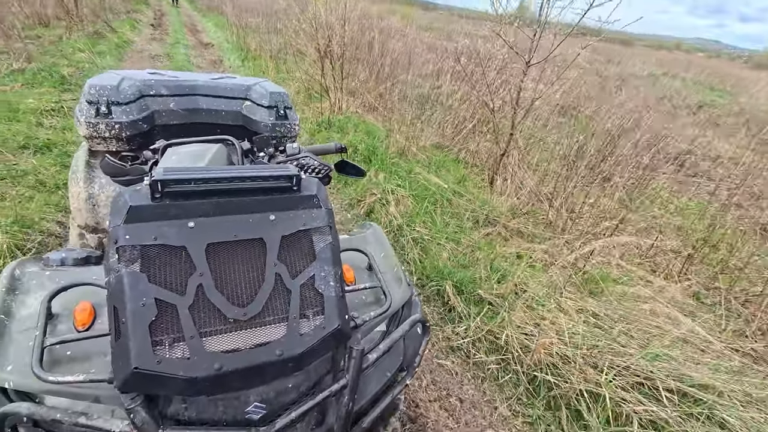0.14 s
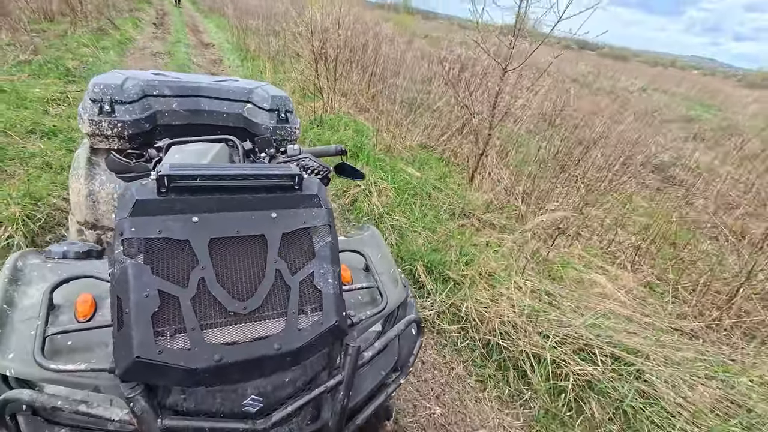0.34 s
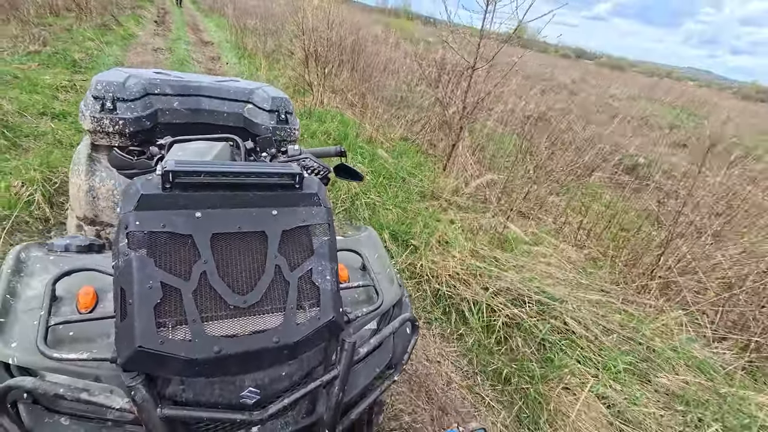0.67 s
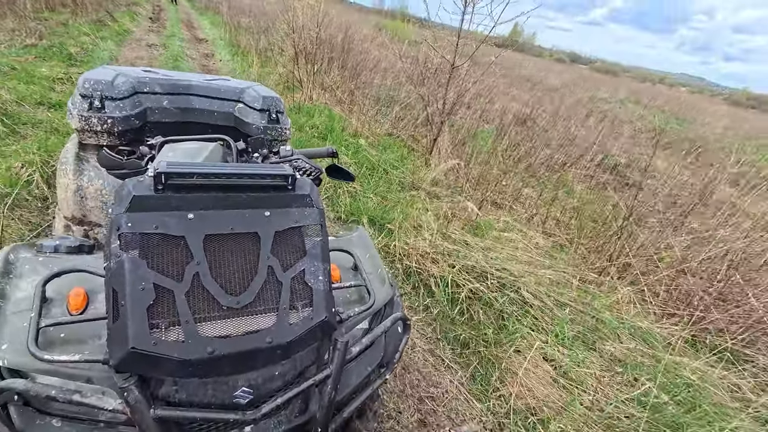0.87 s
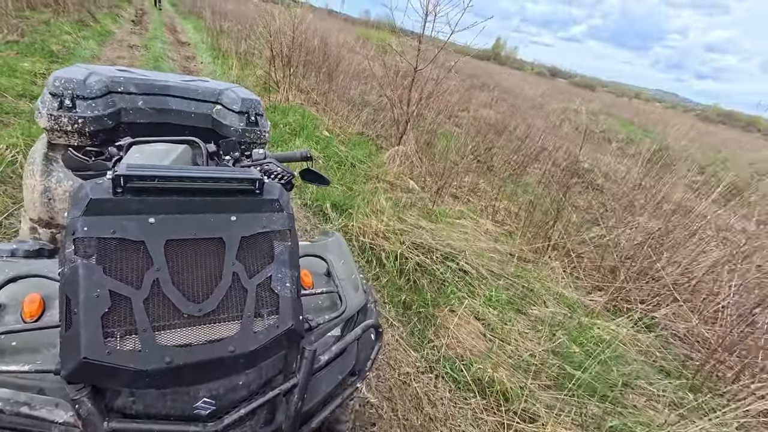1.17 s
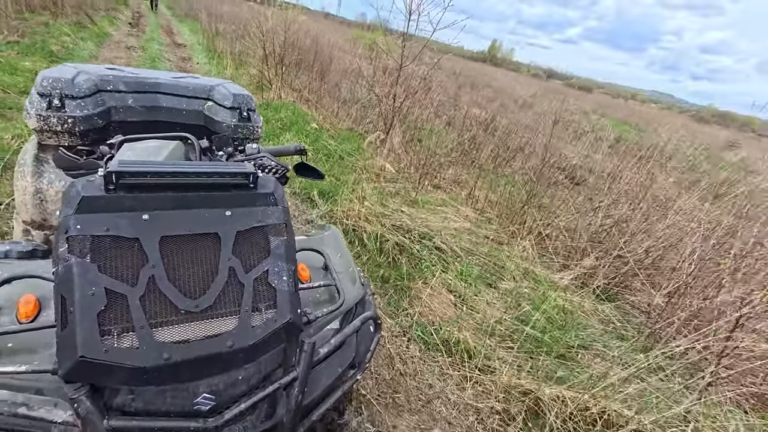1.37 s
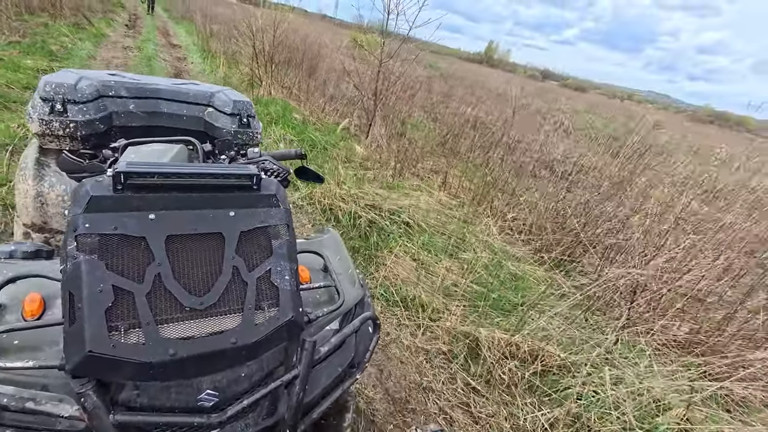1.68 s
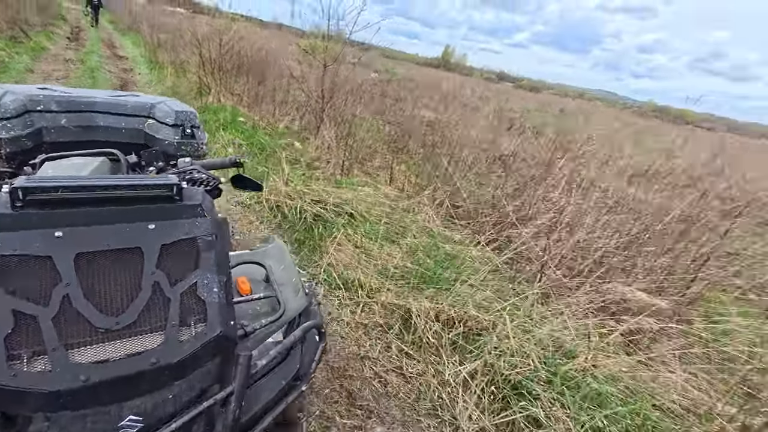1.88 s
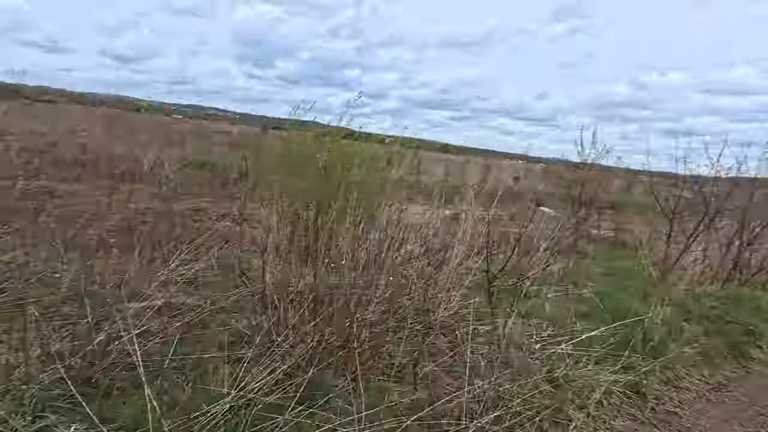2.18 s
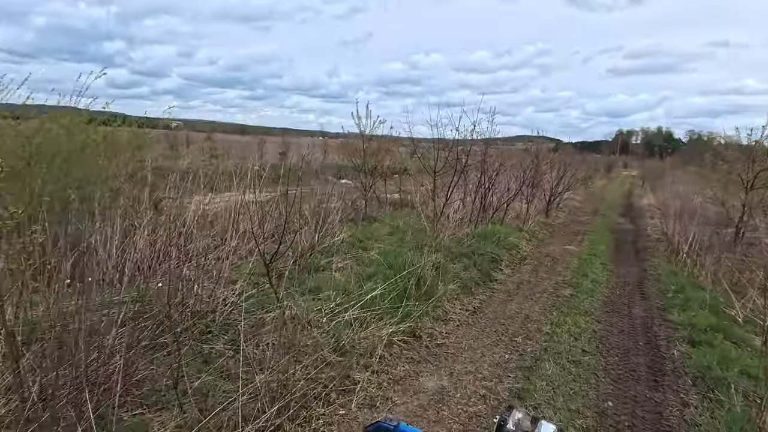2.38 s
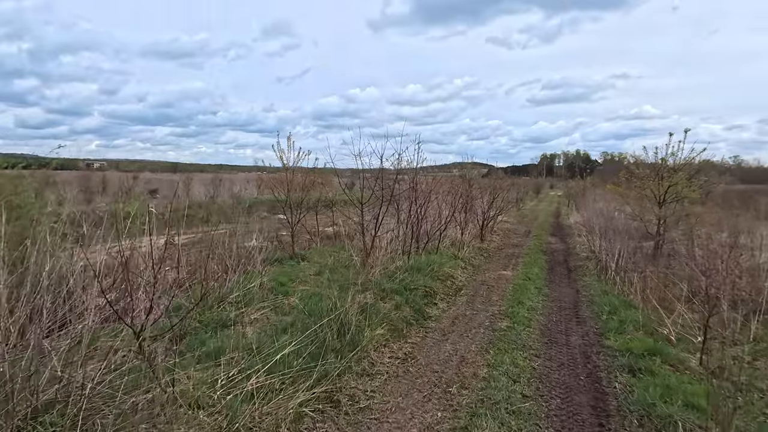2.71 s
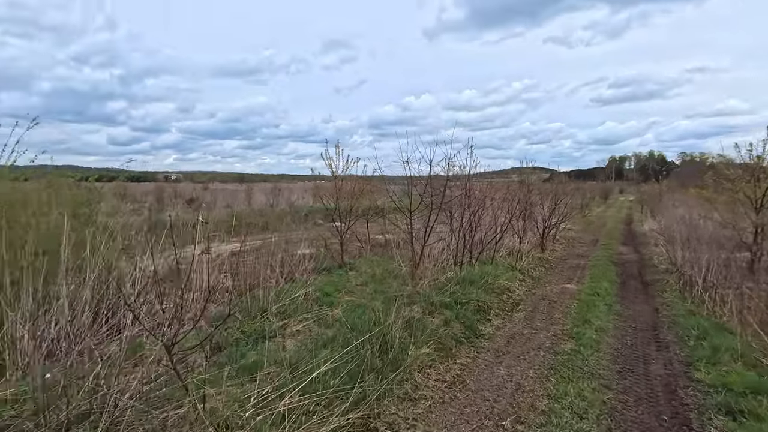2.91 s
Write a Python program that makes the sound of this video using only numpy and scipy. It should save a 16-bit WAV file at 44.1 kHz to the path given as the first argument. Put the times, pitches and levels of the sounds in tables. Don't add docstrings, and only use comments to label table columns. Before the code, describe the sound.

Close outdoor pickup of a quad bike engine: a continuous deep, lumpy boom with rough gas roar, valve ticking and faint loose rattles. Around two seconds in, the revs climb gently and the mechanical tone gets brighter.

```python
import sys
import numpy as np
from scipy import signal
from scipy.fft import rfft, irfft, next_fast_len
from scipy.io import wavfile

SR = 44100
rng = np.random.default_rng(int(sys.argv[2]) if len(sys.argv) > 2 else 0)


def generate_wav(signal):
    frames = np.transpose(np.atleast_2d(signal))
    scaled = np.clip(frames, -1, 1) * 32767
    pcm = np.round(scaled).astype(np.int16)
    wavfile.write(sys.argv[1], SR, pcm)


def amplitude_ratio(level_db):
    exponent = np.asarray(level_db, float) / 20
    return 10 ** exponent


N = 134505

FIRE_AT, FIRE_GAP, VALVE_GAP = 0.52, 0.61, 0.375
LEAD = (0.04, -0.07)


def rms_one(x):
    return x / np.sqrt(np.mean(x ** 2) + 1e-20)


def in_time(rows):
    s, *columns = np.transpose(rows)
    return [np.interp(np.arange(N) / SR, s, column) for column in columns]


def drift(rate_hz):
    r = np.exp(-80 * np.pi * rate_hz / SR)
    noise = rng.standard_normal(N // 40 + 2002)
    slow = signal.lfilter([1], [1, -2 * r, r * r], noise)[2000:]
    return np.interp(np.arange(N) / 40, np.arange(len(slow)), rms_one(slow))


def ring(clicks, hz, t60):
    r = amplitude_ratio(-60 / (t60 * SR))
    w = 2 * np.pi * hz / SR
    return signal.lfilter([0, np.sin(w)], [1, -2 * r * np.cos(w), r * r], clicks + 1e-18)


def coloured(x, spectrum, peaks=()):
    size = next_fast_len(N + 4096)
    hz = np.arange(size // 2 + 1) * SR / size + 1
    points = np.array(spectrum)
    db = np.interp(np.log(hz), np.log(points[:, 0]), points[:, 1], left=-120, right=-120)
    for top_hz, width, top_db in peaks:
        db = db + top_db / (1 + (2 * (hz - top_hz) / width) ** 2)
    return rms_one(irfft(rfft(x, size) * amplitude_ratio(db), size)[:N])


def cycles():
    # (time [s], speed [cycles/s])
    speed = [(0.0, 23.505), (0.22, 22.978), (0.44, 22.774), (0.65, 22.511), (0.87, 22.315), (1.09, 22.511),
             (1.31, 22.07), (1.52, 22.245), (1.74, 22.16), (1.96, 22.395), (2.18, 23.093), (2.4, 23.682),
             (2.61, 23.849), (2.83, 24.056), (3.05, 24.48)]
    return np.cumsum(in_time(speed)[0]) / SR


def firings(spread_db, second_db, lead, gap):
    clicks = np.zeros(N)
    for at, db in ((FIRE_AT + lead, 0), (FIRE_AT + lead + gap, second_db)):
        where = np.flatnonzero(np.diff(np.floor(cycles() - at)))
        strength_db = db + spread_db * rng.standard_normal(100)[:len(where)]
        clicks[where] = amplitude_ratio(strength_db)
    return clicks


def puffs(depth, width_s, spread_db, second_db, lead, gap=VALVE_GAP):
    bump = np.exp(-0.5 * (np.arange(-1000, 1001) / SR / width_s) ** 2)
    clicks = firings(spread_db, second_db, lead + 0.07, gap)
    gate = signal.fftconvolve(clicks, bump, "same")
    return rng.standard_normal(N) * (1 + depth * gate)


def both_sides(turn, make, levels_db):
    facing = amplitude_ratio(levels_db[0]) * make(0)
    turned = amplitude_ratio(levels_db[1]) * make(1)
    return np.sqrt(1 - turn) * facing + np.sqrt(turn) * turned


def boom(turn):
    # (multiple of the cycle rate, level [dB])
    facing = [(1, -34.5), (2, -19), (3, -4), (4, -18), (5, 1.5), (6, -18.5), (7, -29), (8, -25), (9, -24),
              (10, -20.5), (11, -23), (12, -25.5), (13, -27), (14, -20), (15, -35.5), (16, -30), (17, -37),
              (18, -34.5), (19, -28), (20, -36.5), (21, -38), (22, -53.5)]
    # (multiple of the cycle rate, level [dB])
    turned = [(1, -30), (2, -16.5), (3, -4.5), (4, -10), (5, -0.5), (6, -28.5), (7, -17.5), (8, -31.5),
              (9, -16), (10, -25.5), (11, -33.5), (12, -39.5), (13, -34), (14, -37.5), (15, -26.5),
              (16, -32), (17, -27.5), (18, -35.5), (19, -37.5), (20, -45), (21, -45), (22, -32)]
    crest_at = 0.4
    wander_db, wander_rad, wander_hz = 0.1, 0.018, 4
    angle = 2 * np.pi * (cycles() - crest_at)
    out = 0
    for (k, facing_db), (_, turned_db) in zip(facing, turned):
        start = rng.uniform(0, 2 * np.pi) * (k not in (3, 4, 5, 7)) + np.pi * (k in (4, 7))
        db = facing_db + turn * (turned_db - facing_db) + wander_db * k * drift(wander_hz)
        phase = k * angle + start + wander_rad * k * drift(wander_hz)
        out = out + amplitude_ratio(db) * np.cos(phase)
    return np.sqrt(2) * out


def unevenness():
    # (time [s], missing pulse [dB])
    weak = [(.090, -8), (.177, -10), (.5265, -8), (1.020, -14), (1.466, -5), (1.556, -10), (1.646, -5),
            (1.827, -12), (2.023, -8), (2.856, -8), (2.9385, -5.5), (2.977, -11)]
    uneven_db = -19
    pipe_hz, upper_hz, upper_db, rise_s = 90, 260, -15, 0.0062
    clicks = amplitude_ratio(uneven_db) * firings(0, 0, 0, FIRE_GAP) * rng.standard_normal(N)
    for s, db in weak:
        clicks[int(s * SR)] -= amplitude_ratio(db)
    t = np.arange(SR // 20) / SR
    tone = np.sin(2 * np.pi * pipe_hz * t) + amplitude_ratio(upper_db) * np.sin(2 * np.pi * upper_hz * t)
    pulse = tone * (t / rise_s * np.exp(1 - t / rise_s)) ** 2
    return signal.fftconvolve(clicks, pulse - pulse.mean())[:N]


def roar(turn):
    # (frequency [Hz], density [dB per Hz])
    spectra = [
        [(100, -7), (200, -2.5), (400, -13), (870, -13), (960, -20.5), (1350, -21), (1950, -25), (2080, -39)],
        [(100, -17.5), (200, -9.5), (450, -12), (750, -7), (1130, -19.5), (1400, -25), (1980, -13.5),
         (2070, -30.5)],
    ]
    # (frequency [Hz], width [Hz], height [dB])
    peaks = [
        [(855, 40, 1.5), (1072, 76, 6.5), (1510, 67, 8.5), (1863, 58, 9.5)],
        [(1266, 200, 12), (1556, 250, 8), (1694, 210, 7.5), (1930, 17, 12.5)],
    ]
    levels_db = (-26, -25)
    depth = (1.0, 1.7)
    split_hz = 1230

    def part(x, kind):
        sos = signal.butter(4, split_hz, kind, fs=SR, output="sos")
        return rms_one(signal.sosfilt(sos, x))

    def side(k):
        low = puffs(depth=0.23, width_s=0.0018, spread_db=3.5, second_db=3.5, lead=0.071,
                    gap=FIRE_GAP - 0.1)
        high = puffs(depth=depth[k], width_s=0.0028, spread_db=1.2, second_db=-4, lead=LEAD[k])
        high = high * amplitude_ratio(0.4 * drift(10))
        low_share = split_hz / SR * 2
        gas = np.sqrt(low_share) * part(low, "low") + part(high, "high")
        return coloured(gas, spectra[k], peaks[k])

    return both_sides(turn, side, levels_db)


def clatter(turn):
    # (frequency [Hz], density [dB per Hz])
    spectra = [
        [(1900, -5.5), (2700, -7), (4000, -16), (5000, -17.5), (8000, -22), (10900, -32), (12000, -38.5),
         (15700, -49)],
        [(1900, 8), (2700, -11.5), (4000, -11.5), (5000, -13), (8000, -27), (10900, -28), (12000, -34),
         (15700, -55.5)],
    ]
    # (frequency [Hz], width [Hz], height [dB])
    peaks = [
        [(3070, 250, 6), (4200, 800, -2.5), (6840, 320, 9), (10500, 450, 7)],
        [(2250, 28, 1), (4300, 1000, -6), (4930, 100, -0.5), (6900, 270, 0.5), (9300, 630, 6.5)],
    ]
    levels_db = (-49, -40)
    # (frequency [Hz], width [Hz], level [dB])
    valve = [
        (5580, 280, -55),
        (5400, 800, -50.5),
    ]
    hiss = puffs(depth=0.26, width_s=0.0012, spread_db=5.0, second_db=-10.5, lead=0.013)
    hiss = hiss * amplitude_ratio(0.89 * drift(15))
    taps = puffs(depth=2.6, width_s=0.0035, spread_db=1.2, second_db=0.6, lead=0.03)

    def head_side(k):
        hz, width, _ = valve[k]
        return rms_one(ring(taps, hz, 2.2 / width))

    def hiss_side(k):
        return coloured(hiss, spectra[k], peaks[k])

    head = both_sides(turn, head_side, [db for _, _, db in valve])
    head_band = signal.butter(2, [4300, 6600], "band", fs=SR, output="sos")
    return signal.sosfilt(head_band, head) + both_sides(turn, hiss_side, levels_db)


def knock(turn):
    # (frequency [Hz], level [dB], 60 dB decay [s])
    modes = [(1560, -5, .03), (1690, -1, .035), (1780, .5, .04), (1950, -4, .04)]
    levels_db = (-34, -22)

    def rap(k):
        clicks = firings(2.0, -6, LEAD[k] + 0.03, VALVE_GAP)
        return np.convolve(clicks, np.hanning(11) / 4, "same")

    def side(k):
        return sum(amplitude_ratio(db) * ring(rap(k), hz, t60) for hz, db, t60 in modes)

    return both_sides(turn, side, levels_db)


def rattles():
    # (time [s], peak level [dB], pitch [Hz])
    bumps = [(.29, -52, 6000), (.949, -49, 4200), (1.146, -52, 5500), (1.488, -50, 5700),
             (1.572, -51, 4400), (2.023, -28, 480), (2.285, -51, 6000), (2.352, -44, 4400),
             (2.662, -45, 5200), (2.87, -51, 5500), (3.03, -49, 5000)]
    # (frequency [Hz], density [dB per Hz])
    crack_spectrum = [(300, -24), (2000, -8.5), (3500, -6.5), (6000, -11), (9000, -15.5), (13000, -20.5)]
    rise_s, relative_width, ring_db = 0.008, 0.3, 1.0
    out = np.zeros(N + SR)
    broad = coloured(rng.standard_normal(N), crack_spectrum)
    white = rng.standard_normal(4000)
    t = np.arange(4000) / SR
    shape = t / rise_s * np.exp(1 - t / rise_s * 2) * 2
    for s, db, hz in bumps:
        start = int(s * SR)
        edges = [hz * (1 - relative_width / 2), hz * (1 + relative_width / 2)]
        band = signal.butter(2, edges, "band", fs=SR, output="sos")
        own = amplitude_ratio(ring_db) * rms_one(signal.sosfilt(band, rng.permutation(white)))
        crack = rng.choice([-1, 1]) * np.roll(broad, -start)[:4000]
        out[start:][:4000] += amplitude_ratio(db) * shape * (own + (hz > 2000) * crack)
    return out[:N]


def scene():
    # (time [s], share turned away [0-1], boom [dB], mechanical noise [dB])
    swing = [
        (0, 0.14, -7, -2.4),
        (.3, 0.034, -8, -1.64),
        (1, 0.032, -7.5, -1.25),
        (1.5, 0.039, -8, -1.3),
        (1.85, 0.055, -7.5, -1.3),
        (2.1, 0.15, -8.5, -1.2),
        (2.3, 0.77, -8, -3.1),
        (2.65, 0.38, -8.5, 0.2),
        (3.05, .95, -8.5, -2.6),
    ]
    turn, boom_db, noise_db = in_time(swing)
    turn = np.clip(turn, 0, 1)
    crest = 0.92
    exhaust = crest * np.tanh((amplitude_ratio(boom_db) * boom(turn) + unevenness()) / crest)
    mechanical = amplitude_ratio(noise_db) * (roar(turn) + clatter(turn) + knock(turn))
    return (exhaust + mechanical + rattles())[None]


def roll_off(x):
    return signal.sosfilt(signal.butter(12, 15700, fs=SR, output="sos"), x)


def record(dry):
    rumble_cut = signal.butter(2, 28, "high", fs=SR, output="sos")
    mix = signal.sosfiltfilt(rumble_cut, dry, padtype="even")
    return roll_off(mix)


dry = scene()
out = record(dry)
generate_wav(out)
```